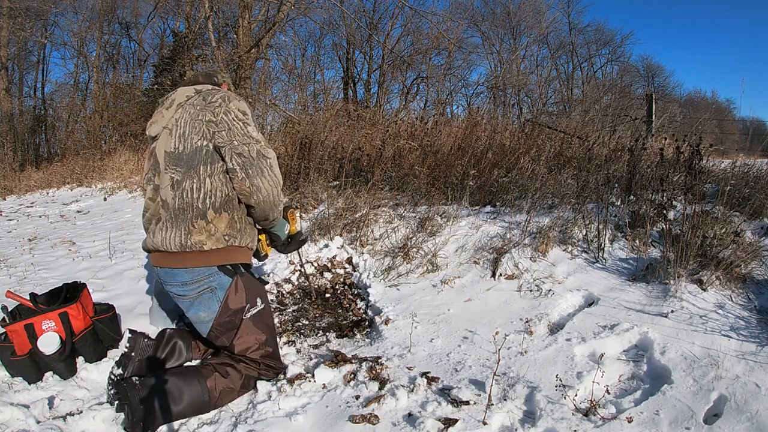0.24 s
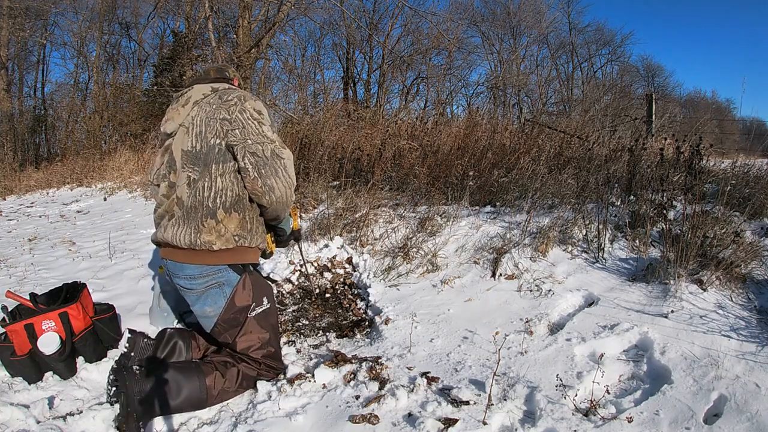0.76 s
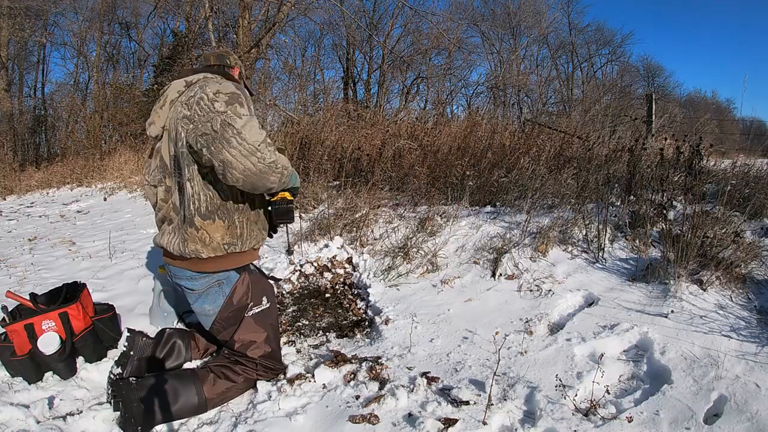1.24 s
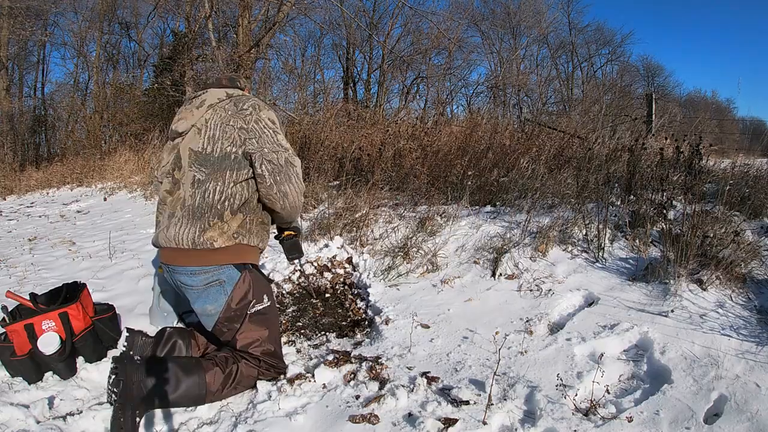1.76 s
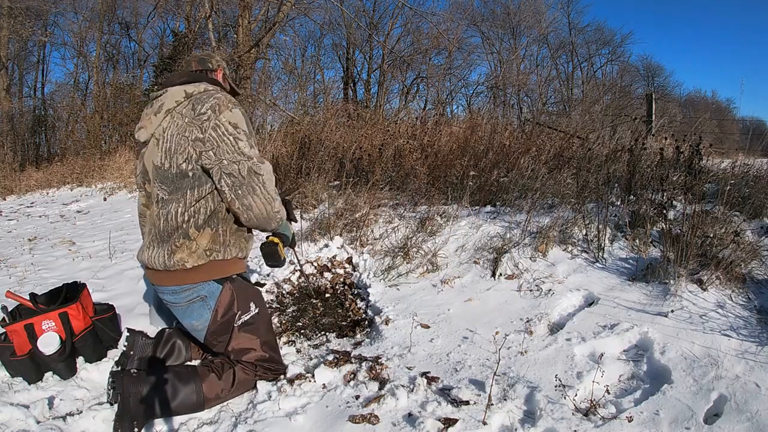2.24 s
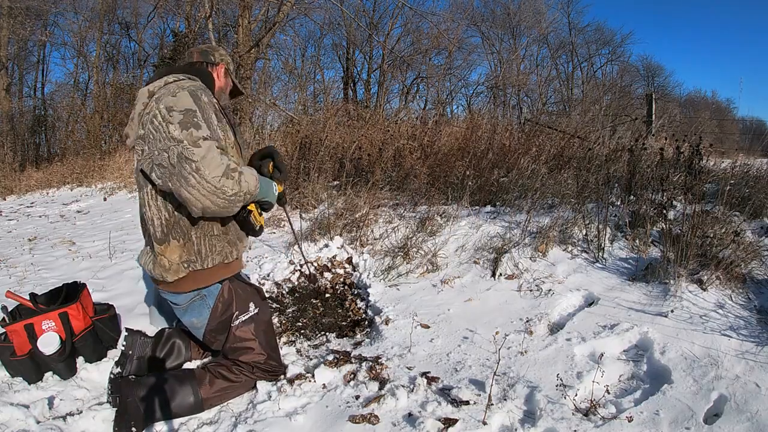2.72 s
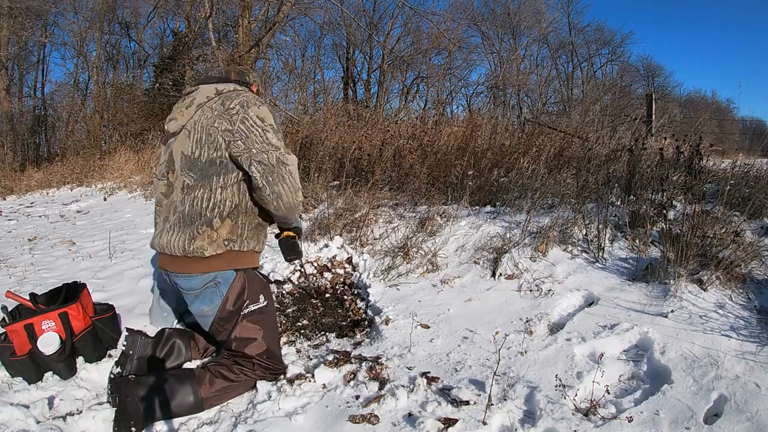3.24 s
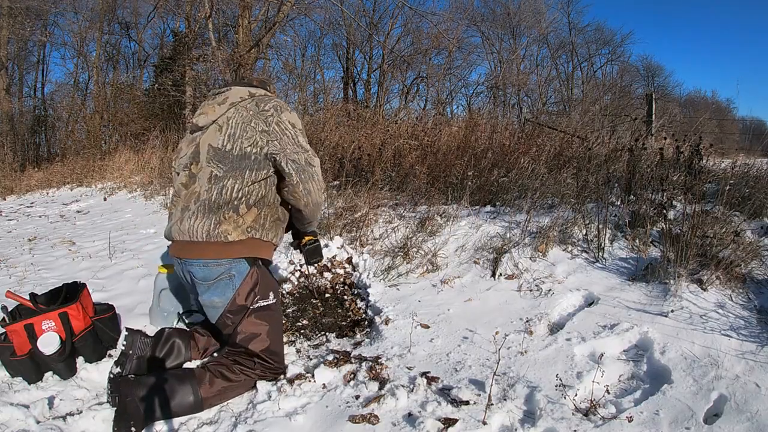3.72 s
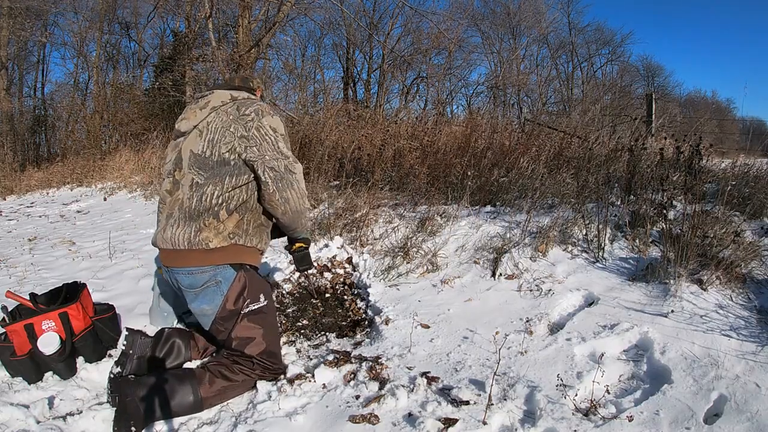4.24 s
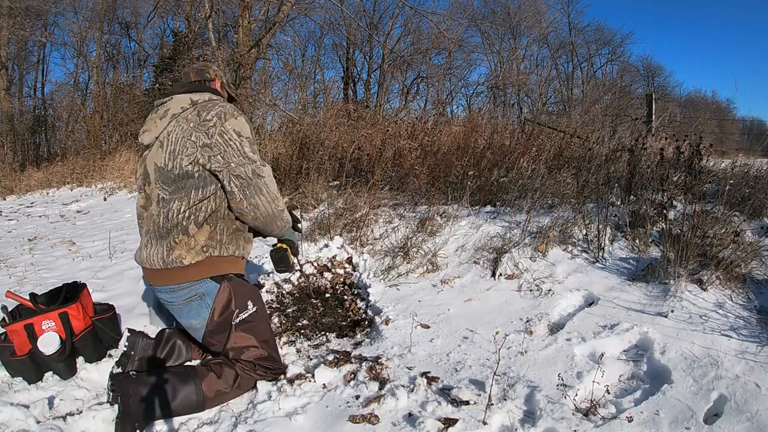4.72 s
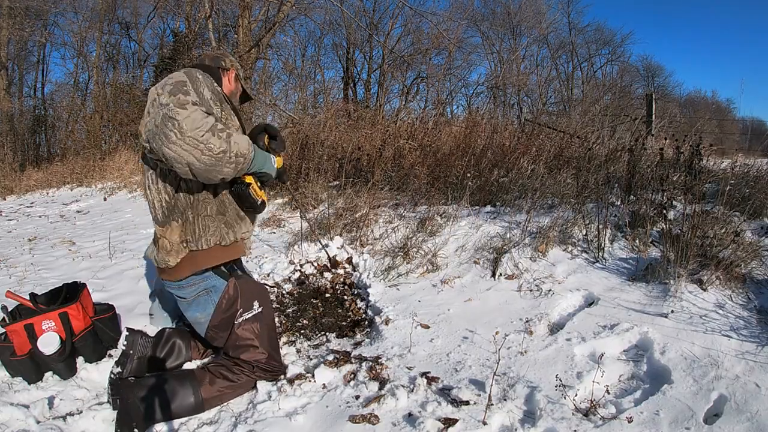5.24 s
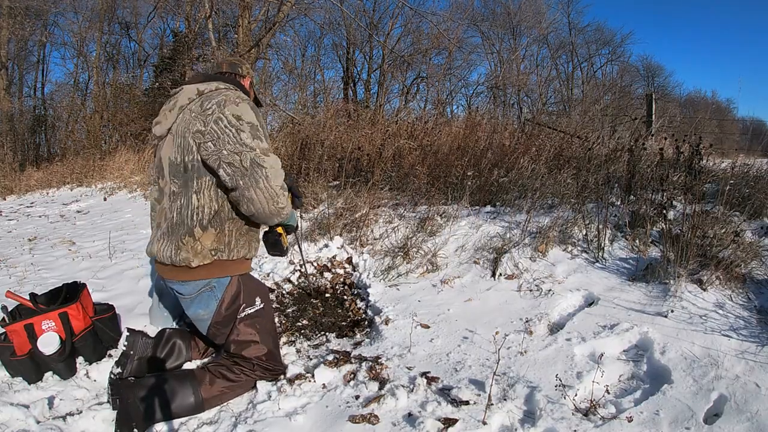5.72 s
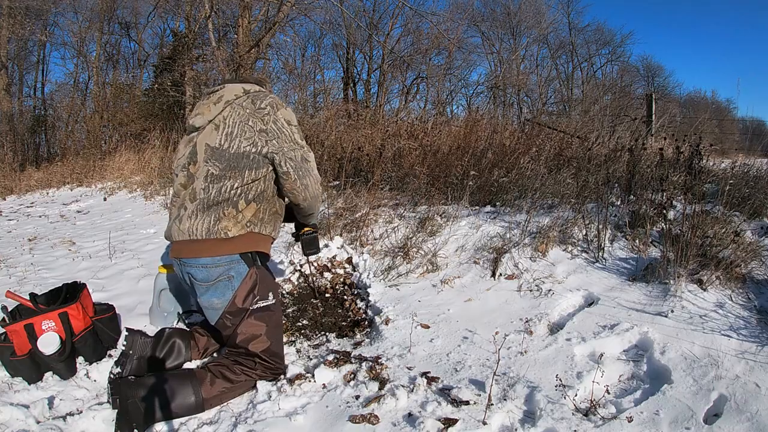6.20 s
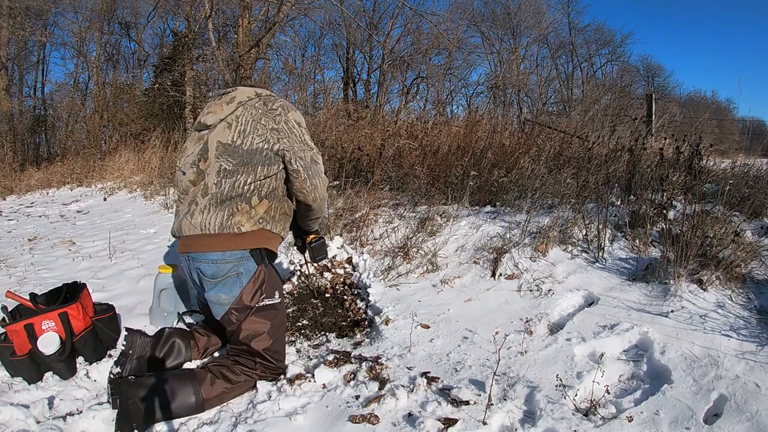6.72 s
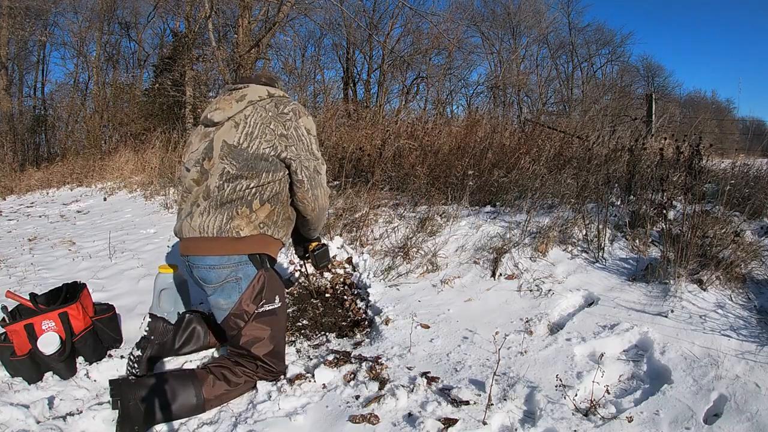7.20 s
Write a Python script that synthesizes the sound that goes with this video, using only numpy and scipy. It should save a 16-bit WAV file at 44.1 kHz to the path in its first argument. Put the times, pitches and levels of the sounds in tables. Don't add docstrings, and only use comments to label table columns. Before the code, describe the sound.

Wind buffets a camera microphone with low rumble and soft thumps over faint air in bare trees. Nearby, a battery drill snarls down to a slow grind, recovers, then stops with plastic knocks and a brush of sleeve and snow. After an abrupt tick it returns at high speed, bores, races and coasts; a longer push follows, then a final steady, loaded grind cut off mid-work.

```python
import sys
import numpy as np
from scipy import signal
from scipy.fft import rfft, irfft, next_fast_len
from scipy.io import wavfile
from scipy.ndimage import uniform_filter1d

SR = 44100
rng = np.random.default_rng(int(sys.argv[2]) if len(sys.argv) > 2 else 0)


def gain_from_db(level_db):
    decades = np.asarray(level_db, float) / 20
    return 10 ** decades


def generate_wav(signal):
    frames = np.transpose(np.atleast_2d(signal))
    scaled = np.clip(frames, -1, 1) * 32767
    pcm = np.round(scaled).astype(np.int16)
    wavfile.write(sys.argv[1], SR, pcm)


N = 328986


def evened(x):
    return x / np.sqrt(np.mean(x ** 2) + 1e-20)


def read(points, hz):
    f, value = np.transpose(points)
    return np.interp(np.log(hz + 1), np.log(f + 1), value)


def follow(rows, t):
    s, *columns = np.transpose(rows)
    return [np.interp(t, s, c) for c in columns]


def add(mix, s, sound):
    part = mix[max(round(s * SR), 0):][:len(sound)]
    part += sound[:len(part)]


def colour(x, gain_db):
    size = next_fast_len(len(x))
    gain = gain_from_db(gain_db(np.fft.rfftfreq(size, 1 / SR)))
    return irfft(rfft(x, size) * gain, size)[:len(x)]


def wander(count, hz, size=16):
    noise = rng.standard_normal(count // size + 2)
    coarse = colour(noise, lambda f: -40 * np.log10(1 + f / (hz * size)))
    return np.interp(np.arange(count) / size, np.arange(len(coarse)), evened(coarse - coarse.mean()))


# frequency [Hz], gain [dB].
SHELL = [(290, -23.5), (500, -1.5), (631, 0), (1720, -2.5), (2230, -1), (3110, -0.5), (4030, -3.5),
         (4530, -7), (4940, -7.5), (5710, -13), (7640, -26), (9360, -20), (10400, -28), (14700, -34.5),
         (16000, -69)]


def housing_db(hz):
    notch_hz, width_hz, notch_db = 4930, 300, -14.5
    return read(SHELL, hz) + notch_db * np.exp(-((hz - notch_hz) / width_hz) ** 2)


def whine(shaft, orders, beat_db):
    out = np.zeros(len(shaft))
    turns = np.cumsum(shaft) / SR
    for multiple, db, width_hz in orders:
        drift = np.cumsum(rng.standard_normal(len(shaft))) * np.sqrt(2 * np.pi * width_hz / SR)
        level = gain_from_db(db + beat_db * wander(len(shaft), hz=16, size=64))
        out += level * np.sin(2 * np.pi * multiple * turns + uniform_filter1d(drift, size=40))
    return out


# multiple of shaft speed [ratio], level [dB], width [Hz].
FREE_GEARS = [(5, -19, 10), (15, -18, 12), (16, -21, 12), (18, -14, 45), (19, -20, 12), (20, -10.5, 8),
              (21, -18, 12), (23, -19, 12), (24, -19, 12), (25, -12, 9), (27, -17, 10), (28, -16, 12),
              (30, -10, 9), (31, -18, 12), (32, -17, 12), (33, -18, 12), (35, -14, 12), (40, -15, 16),
              (45, -17, 16)]
LOADED_GEARS = [(3.65, -23, 25), (7.1, -17, 70), (12.2, -10, 20), (14.45, -14, 25), (17.9, -9, 110),
                (21.4, -17, 18), (25.35, -15, 15), (26.2, -13, 15), (39.3, -17, 12)]
GRIT = [(11.3, -3.5, 240), (12.3, -2.5, 264), (13.2, -4, 237), (13.9, -3, 232)]
GROWL = [(3.5, -4, 97.3), (7.1, -3.5, 184.5), (7.7, -19, 328), (10, -0.5, 294)]


def gearbox(shaft, loaded, pace):
    count = len(shaft)
    turn = np.cos(2 * np.pi * np.cumsum(shaft) / SR)
    uneven_db = 1.0 * wander(count, hz=1.5) + 2 * wander(count, hz=405, size=4)
    chatter = (1 + 0.045 * turn) * gain_from_db(uneven_db) * rng.standard_normal(count)
    free = (1 - .45 * loaded) * np.clip(2 + 1.5 * pace, .6, 1)
    gears = free * whine(shaft, FREE_GEARS, beat_db=3.5)
    gears += loaded * whine(shaft, LOADED_GEARS, beat_db=3.5)
    grit = gain_from_db(-24.5 + 22.5 * loaded) * whine(shaft, GRIT, beat_db=3.0)
    growl = gain_from_db(-13.5 - 10.5 * loaded) * whine(shaft, GROWL, beat_db=0.0)
    return evened(chatter) + gears + grit + growl


def shell_noise(box, rattle_db, vents_db, pace):
    grind = evened(colour(box, lambda f: housing_db(f) - 10 * np.log10(1 + (f / 1500) ** 6)))
    hiss = evened(colour(box, lambda f: housing_db(f) - 10 * np.log10(1 + (5000 / (f + 1)) ** 30)))
    rattle = evened(colour(
        box, lambda f: housing_db(f) - 10 * np.log10(1 + (1500 / (f + 1)) ** 6 + (f / 5000) ** 30)))
    work_db = -40
    excess_db = np.maximum(rattle_db - work_db, -4.5)
    grind_db = -2.5 - 0.67 * excess_db
    hiss_db = -13.5 - 0.033 * excess_db + 2 * pace + vents_db
    return gain_from_db(rattle_db - 3.5) * (rattle + gain_from_db(grind_db) * grind + gain_from_db(hiss_db) * hiss)


# multiple of shaft speed [ratio], level [dB], width [Hz].
BAR_TONES = [(12, 0, 10), (12, -9, 220)]
PLANET_TONES = [(13.1, 0, 14), (13.1, -10, 220), (14.45, -15, 30)]
RING_TONES = [(10.7, 0, 10), (10.7, -9, 150)]
OVERTONES = [(26.2, 3.5, 55), (21.4, -4, 50), (19, -8, 50), (39.3, 2, 90), (28.9, -9, 60), (32.1, -7, 60),
             (52.4, -5, 90)]


def motor_tones(t, shaft, bar_hz, bar_db, mesh_db, ring_db, loaded, pace):
    bars = gain_from_db(bar_db + 3) * whine(shaft, BAR_TONES, beat_db=1 + 1.5 * loaded)
    bars += gain_from_db(mesh_db + 3) * whine(shaft, PLANET_TONES, beat_db=2.5)
    bars += gain_from_db(ring_db + 3) * whine(shaft, RING_TONES, beat_db=1.2)
    octave_db = mesh_db - 33 - 20 * pace
    octaves = gain_from_db(octave_db + 2 - read(SHELL, 2.2 * bar_hz)) * whine(shaft, OVERTONES, beat_db=3.5)
    whip = gain_from_db(-36.5) * np.exp(-((t - 5.21) / .09) ** 2)
    hum = (gain_from_db(-64) + whip) * whine(shaft, [(1, 0, 10)], beat_db=1.5)
    return bars + colour(octaves, housing_db) + hum


# time in seconds [s],
# commutator bar pass [Hz], bar whine [dB], planet mesh [dB], ring mesh [dB].
BITE_SPEED = [
    [(.085, 1832, -66, -54, -60), (.15, 2460, -56, -36, -46), (.2, 2565, -56, -39, -40),
     (.24, 2217, -56, -40, -40), (.3, 2015, -56, -33, -42), (.37, 1610, -56, -35, -48)],
    [(1.795, 4100, -60, -62, -66), (1.97, 4472, -52, -60, -62), (2.05, 4179, -54, -57, -60)],
    [(3.22, 3000, -71, -75, -75), (3.35, 4141, -55, -64, -64), (3.47, 4470, -49, -66, -60),
     (3.59, 4200, -51, -58, -50), (3.68, 4100, -54, -51, -54), (3.77, 3890, -58, -50, -46)],
    [(5.96, 3000, -68, -75, -75), (6.1, 4166, -48, -64, -64), (6.16, 4390, -41, -62, -62),
     (6.24, 4465, -43, -60, -60), (6.31, 4360, -47, -66, -58), (6.42, 4190, -55, -60, -54),
     (6.48, 4000, -48, -52, -52), (6.54, 3900, -56, -51, -49)],
]
DOWN_SPEED = [
    [(.43, 1255, -58, -39, -52), (.49, 1177, -58, -37, -52), (.55, 1603, -56, -37, -50),
     (.72, 1970, -56, -38, -47), (.88, 2198, -56, -39, -46), (.93, 2125, -56, -36, -48)],
    [(2.12, 3929, -61, -57, -60), (2.2, 4179, -50, -57, -58), (2.29, 4360, -48, -55, -56),
     (2.41, 4246, -51, -52, -50), (2.46, 4181, -53, -60, -60)],
    [(4.03, 3950, -58, -51, -46), (4.19, 3928, -58, -49, -45), (4.23, 3870, -58, -46, -48),
     (4.31, 3928, -58, -51, -53), (4.62, 3900, -58, -53, -52), (4.76, 3925, -56, -49, -47),
     (4.86, 3780, -56, -48, -48), (4.92, 3815, -56, -47, -49), (5.04, 3556, -56, -46, -46)],
    [(6.62, 3797, -58, -52, -48), (6.75, 3860, -58, -51, -48), (6.95, 3885, -58, -52, -48),
     (7.2, 3835, -58, -50, -48), (7.3, 3775, -58, -48, -47), (7.46, 3740, -58, -48, -47)],
]
UP_SPEED = [
    [(.955, 2500, -58, -39, -52), (.98, 2490, -62, -62, -66), (1.09, 2624, -60, -62, -66),
     (1.13, 2520, -62, -62, -66), (1.24, 2000, -64, -66, -70)],
    [(2.51, 4472, -44, -66, -66), (2.57, 4640, -41, -66, -66), (2.66, 4190, -46, -66, -66),
     (2.75, 3700, -41, -66, -66), (2.87, 3070, -41, -66, -70), (2.91, 2875, -60, -70, -75),
     (3.07, 2180, -70, -75, -80), (3.22, 1600, -73, -80, -80)],
    [(5.07, 4000, -62, -64, -64), (5.1, 4325, -48, -66, -66), (5.18, 4610, -44, -66, -66),
     (5.24, 4290, -49, -66, -66), (5.3, 3948, -54, -66, -66), (5.34, 3730, -46, -66, -66),
     (5.435, 3230, -45, -66, -66), (5.455, 3130, -60, -70, -70), (5.49, 2994, -66, -75, -75)],
    [],
]
# time in seconds [s], rattle [dB],
# load on the bit [0-1], vents turned to the camera [dB].
DOWN_EFFORT = [
    [(.085, -37, 0.62, -5), (.187, -31.5, 0.48, 0.5), (.865, -36.5, 0.39, 2), (.911, -32.5, 0.56, 2)],
    [(1.795, -46, 0.84, 1), (2.0, -38, 0.14, -0.5), (2.151, -37.5, 0.54, 1.5), (2.405, -27, 0, -6.5),
     (2.469, -40.5, 0.3, -3)],
    [(3.22, -61, 0, -1), (3.29, -43, 0.3, -2), (3.3, -42, 0.4, -0.5), (3.59, -35.5, 0.67, 2.5),
     (3.75, -35.5, 0.6, 2), (3.94, -40.5, 1, 4), (4.52, -38.5, 0.31, 2), (4.87, -32.5, 0.63, 1),
     (5.02, -32, 0.72, 0.5)],
    [(5.96, -54.5, 0.2, -1), (6.018, -40.5, 0.53, 0), (6.16, -36.5, 0.1, 0), (6.418, -34.5, 0.74, 1.5),
     (6.47, -36.5, 1, 3.5), (6.56, -36.5, 0.8, 3), (7.296, -34.5, 0.86, 3.5), (7.326, -34, 0.87, 3),
     (7.46, -35.5, 0.7, 2.5)],
]
UP_EFFORT = [
    [(.975, -42.5, 0.4, 1.5), (1.165, -42.5, 0.4, -3.5), (1.203, -35.5, 0.23, 6), (1.24, -64, 0.7, -6)],
    [(2.547, -33.5, 0.1, 3), (2.8, -34.5, 0.32, 1.5), (2.987, -49, 0.37, 7), (3.22, -57, 0, 3.5)],
    [(5.05, -34, 0.4, -1.5), (5.075, -41, 0.02, 1), (5.23, -32, 0.2, 1.5), (5.32, -35, 0.1, 1),
     (5.43, -36, 0.5, 3.5), (5.46, -41.5, 0.1, -3), (5.49, -64, .05, 5)],
    [],
]


def drill(speed, effort):
    start, end = effort[0][0], effort[-1][0]
    count = next_fast_len(round((end - start) * SR))
    t = start + np.arange(count) / SR
    rattle_db, load, vents_db = follow(effort, t)
    bar_hz, bar_db, mesh_db, ring_db = follow(speed, t)
    bars, full_speed_hz = 12, 4000
    loaded = np.clip(load, 0, 1)
    pace = np.log2(bar_hz / full_speed_hz)
    shaft = uniform_filter1d(bar_hz, size=1200) / bars
    snag = .006 * np.sqrt(loaded) * wander(count, hz=30)
    shaft = shaft * (1 + snag * (full_speed_hz / bar_hz - .8))
    body = shell_noise(gearbox(shaft, loaded, pace), rattle_db, vents_db, pace)
    body += motor_tones(t, shaft, bar_hz, bar_db, mesh_db, ring_db, loaded, pace)
    return start, body * np.clip(np.minimum(t - start, end - t) / 0.0014, 0, 1)


# start in seconds [s], level [dB], ring [Hz], decay by 60 dB [s].
TRIGGER_CLICKS = [
    (0.061, -24, 1660, 0.014),
    (0.078, -21, 3960, 0.014),
    (0.09, -16, 2120, 0.014),
    (1.178, -20, 1220, 0.01),
    (1.197, -21, 1060, 0.014),
    (1.228, -29, 956, 0.014),
    (1.796, -30, 1950, 0.014),
    (5.503, -41, 4100, 0.02),
    (5.527, -52, 9000, 0.01),
    (5.925, -40, 800, 0.012),
]
# start in seconds [s], end [s], level [dB].
SINGING = [
    (.055, .082, -49),
    (3.225, 3.275, -53),
    (5.925, 5.99, -53),
]


def trigger():
    out, t = np.zeros(N), np.arange(2048) / SR
    cracks = rng.standard_normal((len(TRIGGER_CLICKS), 2048))
    for (s, db, hz, t60), crack in zip(TRIGGER_CLICKS, cracks):
        ring = (.6 * crack + .5 * np.sin(2 * np.pi * hz * t)) * gain_from_db(-60 * t / t60)
        ring = np.roll(colour(np.roll(ring, 64), housing_db), -64)[:-64]
        add(out, s, gain_from_db(db + 4) * ring * np.minimum(t[:-64] / .0004, 1))
    add(out, 1.796, gain_from_db(-32) * np.array([1., -.4]))
    switching_hz = 3941
    for s, end, db in SINGING:
        t = np.arange(round((end - s) * SR)) / SR
        tone = np.sin(2 * np.pi * switching_hz * t) * signal.windows.tukey(len(t), .3)
        add(out, s, np.sqrt(2) * gain_from_db(db) * tone)
    return out


# start in seconds [s], length [s], level [dB].
BRUSHES = [
    (0.056, 0.039, -39.5),
    (1.193, 0.023, -28),
    (1.223, 0.023, -45),
    (1.226, 0.089, -54),
    (1.296, 0.048, -59),
    (1.419, 0.084, -55),
    (1.476, 0.05, -54),
    (1.61, 0.054, -56.5),
    (3.479, 0.064, -37.5),
    (5.48, 0.065, -47),
]


def scuffs():
    out = np.zeros(N)
    grains = rng.standard_normal(N) * gain_from_db(4.0 * wander(N, hz=300, size=4))
    grains = evened(colour(grains, lambda f: 1.02 * housing_db(f) - 3 * np.log2(1 + f / 1000)))
    for s, length, db in BRUSHES:
        count = round(length * SR)
        add(out, s, gain_from_db(db) * grains[round(s * SR):][:count] * np.hanning(count))
    return out


# time in seconds [s], strength [dB], turbulence [dB].
GUSTS = [(0.0, -37.5, 7), (0.19, -35.5, 4), (1.39, -45, 4.5), (2.12, -23.5, -9.5), (2.43, -30, -4),
         (2.49, -28.5, -12), (2.68, -31.5, 0), (2.89, -21.5, -27), (2.97, -34.5, -13), (3.3, -25.5, 1),
         (4.09, -22.5, 2), (4.24, -28, -15), (4.49, -27.5, 6.5), (4.74, -39, -6), (4.86, -21, -0.5),
         (5.15, -35, -1.7), (7.29, -27, -2), (7.46, -34, 4.5)]
# frequency [Hz], level [dB].
RUMBLE_SPECTRUM = [(8.8, -47), (15, -6.5), (49, -5), (87, -6.5), (130, -16), (170, -24), (290, -120)]
FLUTTER_SPECTRUM = [(35, -15), (60, -8.5), (160, 0), (240, -6), (309, -15), (600, -26.5), (780, -26.5),
                    (1320, -120)]
# start in seconds [s], level [dB], pitch [Hz], sharp edge re pop [dB].
POPS = [(0.141, -17, 187, -43), (0.188, -24, 198, -17), (0.221, -21.5, 173, -24), (0.445, -30.5, 164, -39),
        (0.841, -26, 171, -29), (1.168, -25, 155, -21), (1.294, -21, 206, -47), (1.697, -29, 169, -51),
        (1.912, -28.5, 135, -38), (2.056, -20.5, 155, -14.5), (2.125, -22.5, 112, -18),
        (2.487, -17.5, 103, -23), (2.768, -27, 118, -18.5), (2.856, -26, 129, -10),
        (3.09, -18.5, 165, -20.5), (3.214, -27.5, 119, -32), (3.466, -25, 137, -14.5),
        (3.765, -38.5, 130, 2.5), (4.035, -24, 137, -15.5), (4.436, -34, 151, -11), (4.87, -33.5, 140, 0),
        (4.964, -27.5, 180, -22), (5.43, -22.5, 163, -20), (5.859, -19.5, 124, -30),
        (6.09, -21.5, 102, -12), (6.516, -16, 180, -17.5), (6.688, -30, 157, -36), (7.069, -35, 133, -8.5),
        (7.306, -23, 121, -16), (7.355, -22.5, 153, -16)]
# start in seconds [s], level [dB].
SMALL_POPS = [(0.267, -20.5), (1.338, -34.5), (1.64, -27.5), (1.789, -25.5), (1.95, -27.5), (2.179, -24),
              (2.706, -34), (3.269, -29), (3.297, -22.5), (3.368, -31), (3.826, -52), (4.235, -27),
              (4.308, -41), (4.575, -31), (5.09, -29.5), (5.605, -31), (5.73, -32), (5.924, -24),
              (6.19, -23), (6.417, -29.5), (6.48, -19.5), (6.623, -33), (6.879, -40.5), (.513, -29),
              (0.931, -29), (2.283, -27), (2.592, -30.5), (2.634, -24.5), (2.796, -28), (2.873, -24.5),
              (3.441, -21), (3.548, -27.5), (3.952, -44), (3.986, -38), (5.125, -26), (5.35, -39),
              (5.478, -26), (5.823, -30), (5.99, -36), (6.338, -39)]


def eddy(cycles, turn, edge_db):
    pop_fade = np.exp(-(cycles / np.where(cycles < 0, .48, .95)) ** 2)
    edge_fade = np.exp(-(cycles / np.where(cycles < 0, .2, .45)) ** 2)
    pop = np.cos(2 * np.pi * (cycles + turn)) * pop_fade
    edge = np.cos(2 * np.pi * (2.59 * cycles + turn)) * edge_fade
    return pop + gain_from_db(edge_db + 10.0) * edge


def wind():
    t = np.arange(N) / SR
    coarse = t[::256]
    ripple_hz, ripple_edge_db = 142, -23
    eddies = POPS + [(s, db, ripple_hz, ripple_edge_db) for s, db in SMALL_POPS]
    gust_db, swirl_db = follow(GUSTS, t)
    wake = sum(gain_from_db(db - 8.5) * np.exp(-((coarse - s) / .022) ** 2) for s, db, hz, edge_db in eddies)
    stir = gain_from_db(-38.5 + swirl_db + 0.6 * (gust_db - gust_db.mean())) + np.interp(t, coarse, wake)
    rumble = rng.standard_normal(N) * gain_from_db(2 * wander(N, hz=6))
    rumble = evened(colour(rumble, lambda f: read(RUMBLE_SPECTRUM, f)))
    lumps = rng.standard_normal(N) * stir * gain_from_db(4.5 * np.clip(wander(N, hz=25), -3, 2) - 4)
    flutter = colour(lumps, lambda f: read(FLUTTER_SPECTRUM, f))
    flutter = flutter * np.std(lumps) / np.std(flutter)
    shove = sum(gain_from_db(db - 11) * np.exp(-((coarse - s - .01) / .019) ** 2) for s, db, hz, edge_db in eddies)
    out = (gain_from_db(gust_db - 1) + np.interp(t, coarse, shove)) * rumble + flutter
    for (s, db, hz, edge_db), turn in zip(eddies, rng.random(len(eddies))):
        cycles = np.arange(-3 * SR / hz, 5 * SR / hz) * hz / SR
        add(out, s + 0.00282 + (.8 - 3) / hz, gain_from_db(db + 5.0) * eddy(cycles, turn, edge_db))
    moan_s, half_s, moan_hz, moan_db = .035, .04, 288, -40
    out += gain_from_db(moan_db) * np.exp(-((t - moan_s) / half_s) ** 4) * np.sin(2 * np.pi * moan_hz * t)
    limit = .42
    return limit * np.tanh(out / limit)


# frequency [Hz], level [dB].
FAR_AIR = [(210, -69), (350, 2), (391, -13), (514, 2.5), (653, -9), (766, -2.5), (2750, -22), (4180, -22),
           (6750, -39.5), (12200, -46), (16000, -68)]


def field():
    lift_hz, width_hz, lift_db = 9300, 350, 9
    air = colour(rng.standard_normal(N),
                 lambda f: read(FAR_AIR, f) + lift_db * np.exp(-((f - lift_hz) / width_hz) ** 2))
    return gain_from_db(-51.5 + wander(N, hz=9)) * evened(air)


def scene():
    motor = np.zeros(N)
    for bite, down, up, push, pull in zip(BITE_SPEED, DOWN_SPEED, UP_SPEED, DOWN_EFFORT, UP_EFFORT):
        add(motor, *drill(bite + down + up, push + pull))
    return (motor + trigger() + scuffs() + wind() + field())[None]


def roll_off(x):
    return signal.sosfilt(signal.butter(12, 16190, fs=SR, output="sos"), x)


def record(dry):
    return roll_off(dry)


dry = scene()
out = record(dry)
generate_wav(out)
```